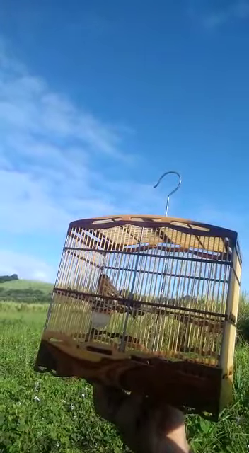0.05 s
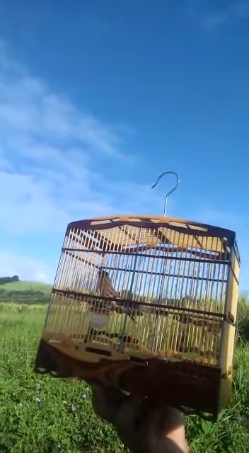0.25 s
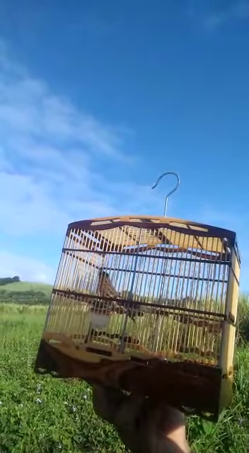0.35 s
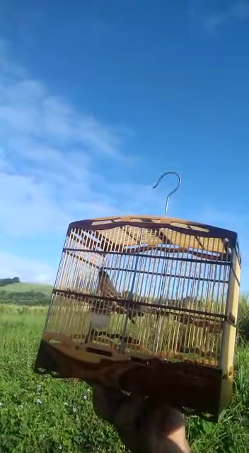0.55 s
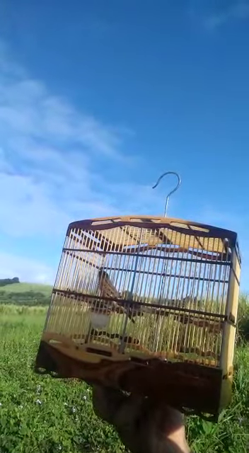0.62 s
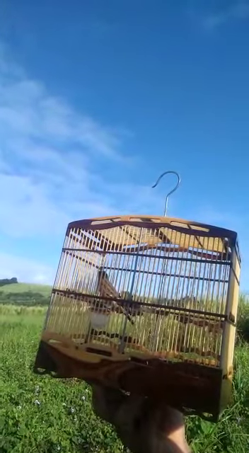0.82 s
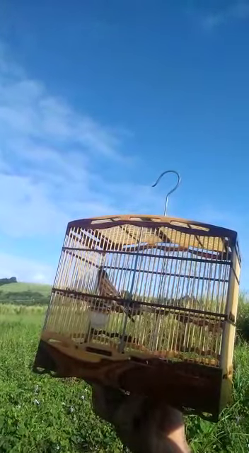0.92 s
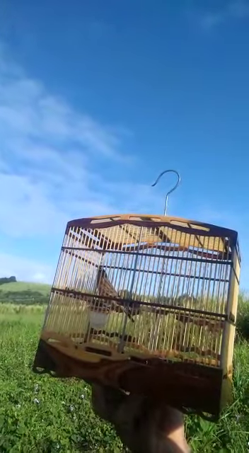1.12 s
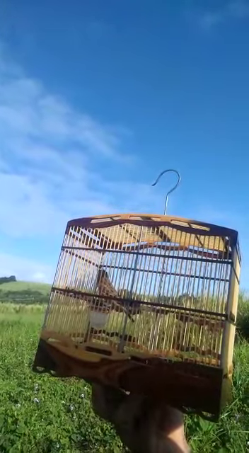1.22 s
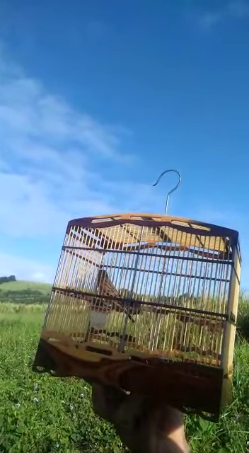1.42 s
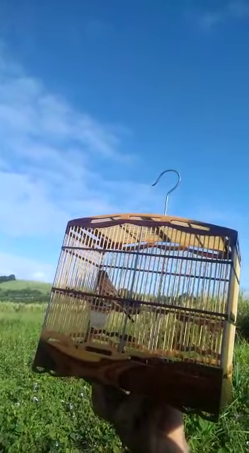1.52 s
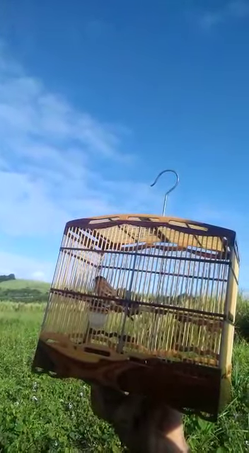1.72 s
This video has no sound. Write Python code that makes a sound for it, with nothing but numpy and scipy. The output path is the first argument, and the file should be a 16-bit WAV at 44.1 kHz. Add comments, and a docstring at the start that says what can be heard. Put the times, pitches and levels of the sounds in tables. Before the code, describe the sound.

Birdsong outdoors, close and leaning right: a soft falling whistle, louder slurs, a bright trembling high note, a small squeak and rise, then a steep dive; very quiet insect trills and distant hush continue behind.

```python
"""Caged seedeater in a grassy field

A caged bird, held up in an open field, sings six whistled notes: four falling slurs, two of them breaking into
a fast tremor, and a reedy squeak that runs into a low rising whistle. Each note is a sine with overtones that
follows drawn curves of pitch and level. Decaying noise gives a faint short tail from the grass. Three crickets
trill in bouts of short tones, over shaped noise (insect chorus, distant hush, low rumble) and a low sine drone.
"""
import sys
import numpy as np
from scipy import signal
from scipy.fft import rfft, irfft
from scipy.io import wavfile
from scipy.ndimage import uniform_filter1d

SR = 44100
rng = np.random.default_rng(int(sys.argv[2]) if len(sys.argv) > 2 else 0)


def generate_wav(signal):
    """Clip the signal to [-1, 1] and save it as 16-bit WAV at the path in sys.argv[1]."""
    frames = np.transpose(np.atleast_2d(signal))
    scaled = np.clip(frames, -1, 1) * 32767
    pcm = np.round(scaled).astype(np.int16)
    wavfile.write(sys.argv[1], SR, pcm)


N = 77175
TIME = np.arange(N) / SR  # seconds
EDGE_S = .0025  # softness of the edges of notes and cricket bouts, in seconds


def from_db(db):
    """Turn decibels into gain."""
    return 10 ** (np.asarray(db) / 20)


def rms_one(x):
    """Scale a sound to unit power."""
    return x / np.sqrt(np.mean(x ** 2) + 1e-20)


def in_time(rows):
    """Read the columns of a curve at every sample; the first column is time."""
    seconds, *columns = np.transpose(rows)
    return [np.interp(TIME, seconds, column) for column in columns]


def at_hz(points, hz):
    """Read a curve over frequency, with straight lines on a log-frequency axis."""
    point_hz, value = np.transpose(points)
    return np.interp(np.log(hz), np.log(point_hz), value)


def drift(rate):
    """Random wander of spread 1: noise smoothed by a low-pass at `rate` Hz."""
    r = np.exp(-2 * np.pi * rate / SR)
    wander = signal.lfilter([1], [1, -2 * r, r * r], rng.standard_normal(N + SR))
    return rms_one(wander[SR:])  # drop the filter's first second


def pan(db):
    """Left and right gains whose mean is 1, for a left-minus-right level in dB."""
    ratio = np.atleast_1d(from_db(db))
    return 2 * np.array([ratio, np.ones_like(ratio)]) / (1 + ratio)


def gate(start, end):
    """Open between two times, with soft edges."""
    from_edge = np.minimum(TIME - start, end - TIME)
    return np.sin(np.pi / 2 * np.clip(from_edge / EDGE_S + .5, 0, 1)) ** 2


def bird():
    """The whole phrase: five whistles, a squeak, two faint second tones and the rasps."""
    # The course of each note. Each row: time in seconds, pitch in Hz, level in dB, left minus right in dB.
    opening = [(0.165, 3206, -69, -9), (0.207, 2937, -35, -9.0), (0.235, 2815, -28.5, -7.5),
               (0.289, 2658, -31, -12), (0.337, 2532, -34, -11.5), (0.346, 2530, -40, -11)]
    slur = [(0.45, 3830, -50, -2), (0.468, 3696, -28, -0.5), (0.5, 3563, -19, -6.5),
            (0.542, 3535, -19.5, -6.5), (0.638, 3281, -21.5, -12.5), (0.652, 3340, -23, -10)]
    high = [(0.76, 4830, -44.5, -12.5), (0.78, 4795, -21, -7.5), (0.816, 4760, -16, -6),
            (0.85, 4721, -15.5, -3.5), (0.894, 4440, -18, -7.5), (0.914, 4370, -16.5, -5),
            (0.928, 4323, -22.5, -11)]
    squeak = [(1.084, 4380, -39, -11.5), (1.092, 4874, -34, -8), (1.11, 5136, -31, -11),
              (1.138, 5268, -32, -10), (1.15, 5207, -35, -9)]
    rise = [(1.16, 2845, -49, -15.5), (1.17, 2667, -43.5, -9.5), (1.202, 2696, -29, -12),
            (1.258, 2765, -26.5, -9.5), (1.284, 2821, -28.5, -7.5), (1.297, 2595, -61, -12.5)]
    dive = [(1.374, 5530, -54.5, -3.5), (1.384, 5120, -35.5, -10), (1.408, 4390, -21, -5.5),
            (1.426, 4140, -20, -3), (1.45, 3708, -20.5, -3), (1.476, 3482, -21.5, -6.5),
            (1.51, 3344, -27.5, -10), (1.52, 3250, -59.5, -7)]
    # The squeak's lower voice lingers, and a faint side tone sounds over the slur; same columns.
    linger = [(1.152, 3530, -37, -2), (1.159, 3510, -37, -14), (1.165, 3560, -42.5, -4.5)]
    side_tone = [(.508, 5290, -60.5, -16.5), (.52, 5280, -56, -7.5), (.536, 5280, -64.5, -9)]
    # The squeak is a stack of harmonics whose third leads. Each value: level of a partial in dB.
    squeak_partials_db = (-28, -11, -2, -26.5, -44, -49, -34.5, -35, -32.5)
    # Rasps where a note catches or breaks off.
    # Each row: time in seconds, half width in seconds, centre in Hz, band width in Hz, level in dB.
    rasp_moments = [(.4505, 0.0015, 4020, 1197, -51), (0.7602, 0.0009, 4800, 806, -39.5),
                    (1.085, 0.0078, 4560, 2000, -40.5), (1.156, 0.0053, 4400, 1460, -49),
                    (1.394, 0.02, 5000, 910, -50)]

    # levels of harmonics 1 to 4 in dB; lead in radians
    whistles = (note(opening, (0, -26, -47, -46.5), lead=-.05)
                + note(slur, (0, -47, -36, -49), lead=.64)
                + note(high, (0, -39.5, -40.5, -66), lead=-.38)
                + note(rise, (0, -24.5, -47.5, -40.5), lead=.09)
                + note(dive, (0, -41, -35.5, -45.5), lead=.57))
    second_voice = note(linger, [0]) + note(side_tone, [0])
    reedy_squeak = note(squeak, squeak_partials_db, order=3)
    rasps = pan(-9) * sum(rasp(*row) for row in rasp_moments)
    return whistles + second_voice + reedy_squeak + rasps


def note(course, partials_db, lead=0, order=1):
    """A note of the syrinx (the bird's voice organ): a sine and its overtones, shaken by any tremor.

    The course gives the pitch of partial number `order`; `lead` puts the left side's phase ahead, in radians.
    """
    # Tremors of the syrinx. Each row: middle in seconds, half width in seconds, rate in Hz,
    # pitch swing in Hz, level swing in dB.
    tremors = [(.842, .016, 128, 60, .25), (.892, .034, 116, 205, 1.8), (1.389, .013, 215, 130, 1.2),
               (1.417, .015, 140, 135, .8), (1.4415, .008, 112, 170, -1.2)]
    # How throat and beak colour the partials. Each row: frequency in Hz, level in dB.
    throat = [(5500, 0), (8700, 8), (9500, -11.5), (10200, -19.5), (11200, -5), (13000, -1), (14400, 11.5),
              (15600, -3)]
    tremor_uneven = .17  # wander of the tremor's cycle, in radians
    tremor_cusp = .2  # makes the upward flicks sharper than the troughs
    jitter, shimmer_db, jitter_hz = .0025, .15, 75  # share of the pitch, level wander, speed of all wander
    release_s = .0097  # fade after the note
    overtone_lead = 2.5  # extra phase lead of the overtones on the left, in radians

    hz, db, side_db = (uniform_filter1d(c, int(EDGE_S * SR)) for c in in_time(course))

    # a tremor shakes pitch and level together
    uneven = tremor_uneven * drift(jitter_hz)
    for middle, width, rate, swing_hz, swing_db in tremors:
        cycle = 2 * np.pi * rate * (TIME - middle) + uneven
        flicks = np.cos(cycle) + tremor_cusp * np.cos(2 * cycle)
        shake = np.exp(-((TIME - middle) / width) ** 2) * flicks
        hz = hz + swing_hz * shake
        db = db + swing_db * shake
    hz = hz * (1 + jitter * drift(jitter_hz)) / order  # now the pitch of the first partial

    start, end = course[0][0], course[-1][0]
    release = np.cos(np.pi / 2 * np.clip((TIME - end) / release_s, 0, 1)) ** 2
    level = from_db(db + shimmer_db * drift(jitter_hz)) * gate(start, np.inf) * release

    left = np.array([[1], [0]])
    phase = 2 * np.pi * np.cumsum(hz) / SR + lead * left
    tone = 0
    for k, partial_db in enumerate(partials_db, 1):
        gain = from_db(partial_db + at_hz(throat, k * hz))
        gain = gain * (k * hz < SR / 2)  # leave out what is too high for the sample rate
        tone = tone + gain * np.sin(k * phase + overtone_lead * left * (k > order))
    return level * pan(side_db) * np.sqrt(2) * tone


def rasp(s, width, hz, band_hz, db):
    """A moment of irregular vibration between two kinds of tone: a puff of band-limited noise."""
    band = signal.butter(2, [hz - band_hz / 2, hz + band_hz / 2], "band", fs=SR, output="sos")
    noise = signal.sosfilt(band, rng.standard_normal(N))
    noise = signal.sosfilt(band, noise)  # twice, for steeper sides
    return from_db(db) * np.exp(-((TIME - s) / width) ** 2) * rms_one(noise)


def grass_tail(x):
    """Faint scatter from the cage and the plants around it: the song smeared by decaying noise."""
    tail_db, t60_s, delay_s = -24.5, .2, .0057  # level, time to fall by 60 dB, wait before the tail
    low_hz = 3580  # thin bars and blades scatter mostly the highest notes
    t = TIME[:SR // 2]
    scatter = rng.standard_normal((2, len(t))) * from_db(-60 * t / t60_s) * (t > delay_s)
    scatter /= np.sqrt(np.sum(scatter ** 2, axis=1, keepdims=True))
    scatter = signal.sosfilt(signal.butter(2, low_hz, "high", fs=SR, output="sos"), scatter)
    return from_db(tail_db) * signal.fftconvolve(x, scatter, axes=1)[:, :N]


def crickets():
    """Three crickets, each with its own wing pitch, stroke rate and place."""
    # Bouts of trilling. Each row: start in seconds, end in seconds, level in dB.
    near_bouts = [(0., .105, -61), (.572, .82, -60), (1.377, 1.596, -58.5)]
    far_bouts = [(.125, .41, -61.5), (.575, .87, -62.5)]
    faint_bouts = [(.355, .6, -68.5), (1.15, 1.38, -64.5)]
    near = cricket(near_bouts, hz=5713, rate=56.5, sag_hz=87.5, octave_db=-21, side_db=-18)
    far = cricket(far_bouts, hz=6632.5, rate=45, sag_hz=256.5, octave_db=-43.5, side_db=0)
    faint = cricket(faint_bouts, hz=5542, rate=55.5, sag_hz=117, octave_db=-27, side_db=-11.5)
    return near + far + faint


def cricket(bouts, hz, rate, sag_hz, octave_db, side_db):
    """Each wing stroke, `rate` of them a second, is a short tone that sags in pitch."""
    jitter = .003  # share of the pitch
    out = 0
    for start, end, db in bouts:
        stroke = ((TIME - start) * rate) % 1  # 0 to 1 through each stroke
        pitch = hz * (1 + jitter * drift(300)) - sag_hz * (stroke - .5)
        phase = 2 * np.pi * np.cumsum(pitch) / SR
        tone = np.sin(phase) + from_db(octave_db) * np.sin(2 * phase)
        out = out + 2 * from_db(db) * gate(start, end) * np.sin(np.pi * stroke) ** 2 * tone
    return pan(side_db) * out


def field():
    """Insect chorus, distant hush and rumble from coloured noise, and a wavering drone of sines."""
    # Colours of the noises. Each row: frequency in Hz, relative level in dB per Hz.
    chorus_colour = [(4800, -22.5), (5700, -4), (6200, -8), (6850, 4.5), (7500, -1.5), (8000, -11),
                     (8600, -21.5), (10000, -44)]
    hush_colour = [(150, -15.5), (350, -10.5), (600, -7), (800, -2), (1050, 1.5), (1400, -6.5), (2300, -8),
                   (3200, -20), (4600, -29), (9500, -31), (12000, -33.5), (15000, -23)]
    rumble_colour = [(20, -47), (32, -31.5), (42, -5), (50, -1), (75, 0), (105, -5.5), (130, -11.5),
                     (160, -12), (220, -20.5), (330, -34.5), (600, -44.5)]
    # Rise and fall of hush and rumble, used relative to their mean. Each row: time in seconds, level in dB.
    hush_swell = [(0.0, -54), (0.102, -57.5), (0.286, -51.5), (0.744, -54), (1.628, -54), (1.75, -58.5)]
    rumble_swell = [(0.0, -58), (0.106, -52), (0.116, -51), (0.906, -47), (0.954, -46), (0.994, -52),
                    (1.174, -47), (1.554, -50.5), (1.602, -47), (1.686, -60.5), (1.714, -49), (1.75, -50)]
    # A far drone. Each row: frequency in Hz, level in dB.
    drone_tones = [(51.5, -56), (102, -59), (153, -66)]
    chorus_db, hush_db, rumble_db = -60, -54.5, -50.5

    chorus = from_db(chorus_db) * field_noise(chorus_colour)
    (swell_db,) = in_time(hush_swell)
    hush = from_db(hush_db + swell_db - swell_db.mean()) * field_noise(hush_colour)
    (surge_db,) = in_time(rumble_swell)
    rumble = from_db(rumble_db + surge_db - surge_db.mean()) * field_noise(rumble_colour)
    drone = 0
    for hz, db in drone_tones:
        level = from_db(db + 1.2 * drift(4))
        drone = drone + level * np.sqrt(2) * np.sin(2 * np.pi * hz * TIME + .5 * drift(1))
    return chorus + hush + rumble + drone


def field_noise(spectrum):
    """Stereo noise of a given colour and unit power, more diffuse towards the treble."""
    # How alike left and right are. Each row: frequency in Hz, likeness (1 same, 0 unrelated, below 0 opposed).
    likeness = [(60, 1), (290, 0.89), (1000, 0.7), (3100, 0.98), (6500, -0.3), (8000, -0.17), (15000, -0.3)]
    # Each row: frequency in Hz, left minus right in dB.
    balance = [(60, -3.5), (600, 2), (1200, -5.5), (2400, -8), (4400, -4), (6800, -1), (10000, 0.5),
               (15000, 4.5)]
    hz = np.maximum(np.fft.rfftfreq(N, 1 / SR), 1)
    mid, side = rfft(rng.standard_normal((2, N)))
    alike = np.clip(at_hz(likeness, hz), -1, 1)
    pair = np.sqrt(1 + alike) * mid + np.sqrt(1 - alike) * side * [[1], [-1]]
    top = 1 / (1 + (hz / (2 * spectrum[-1][0])) ** 10)  # fade out an octave above the last point
    colour = top * from_db(at_hz(spectrum, hz))
    return rms_one(irfft(pair * colour * pan(at_hz(balance, hz)), N))


def scene():
    """The bird close by with its tail, the crickets and the field behind it."""
    song = bird()
    return song + grass_tail(song) + crickets() + field()


def record(dry):
    """Cut the top steeply above 15900 Hz, with a low-pass run forwards and backwards."""
    low_pass = signal.ellip(10, .05, 60, 15900, fs=SR, output="sos")
    return signal.sosfiltfilt(low_pass, dry)


dry = scene()
out = record(dry)
generate_wav(out)
```